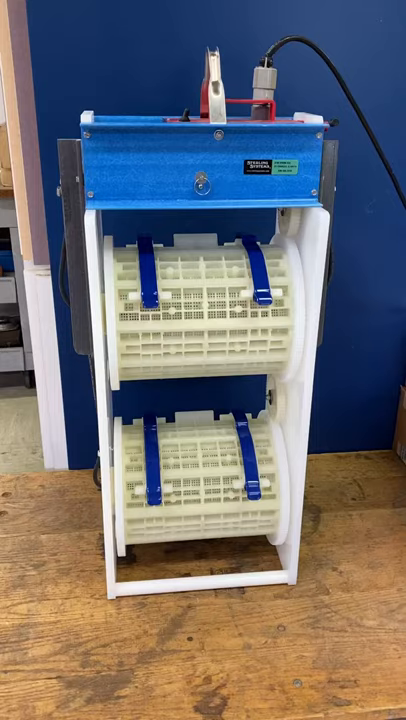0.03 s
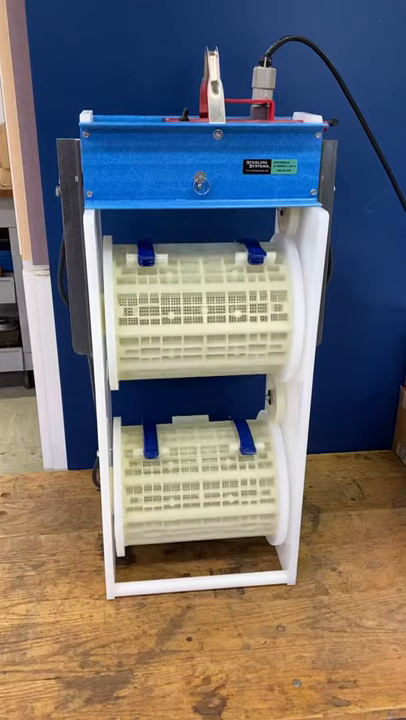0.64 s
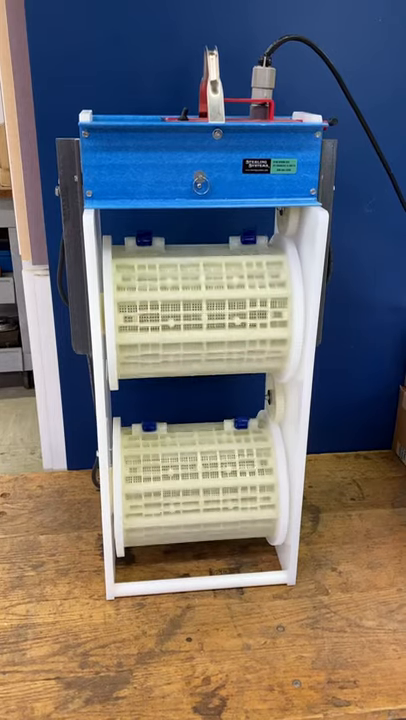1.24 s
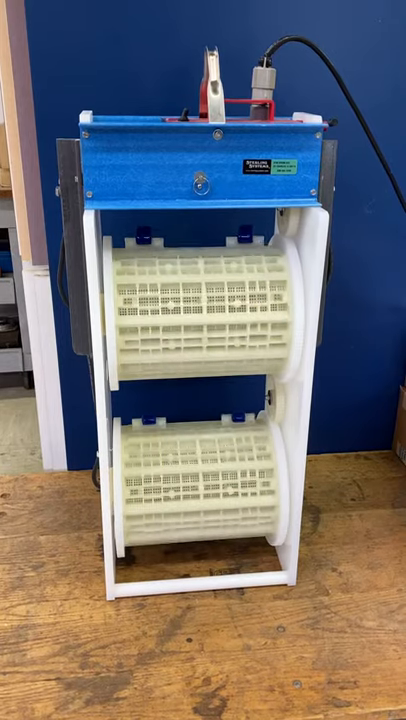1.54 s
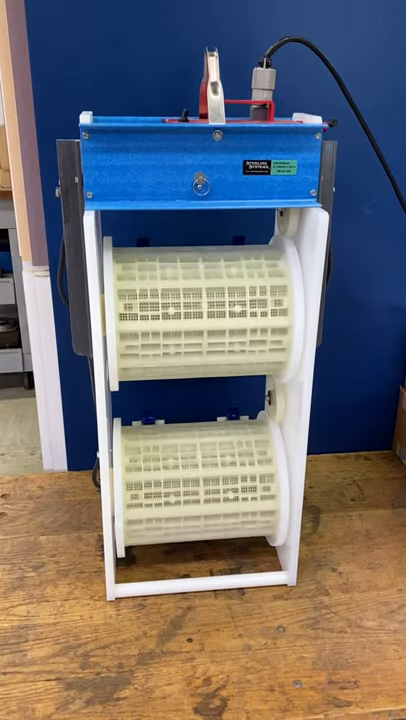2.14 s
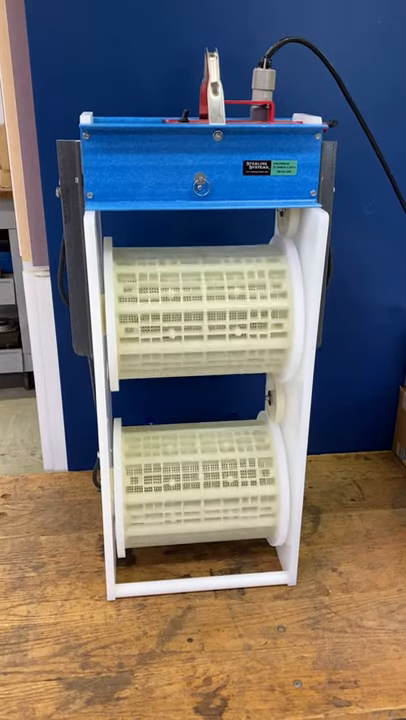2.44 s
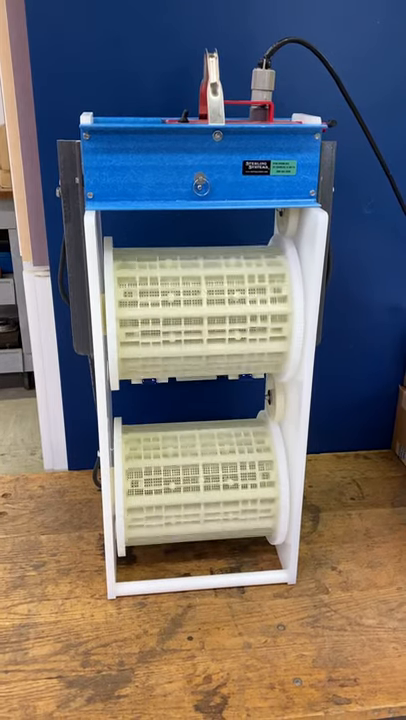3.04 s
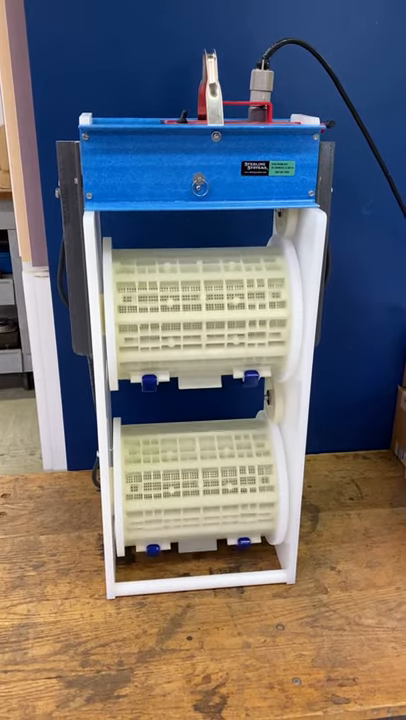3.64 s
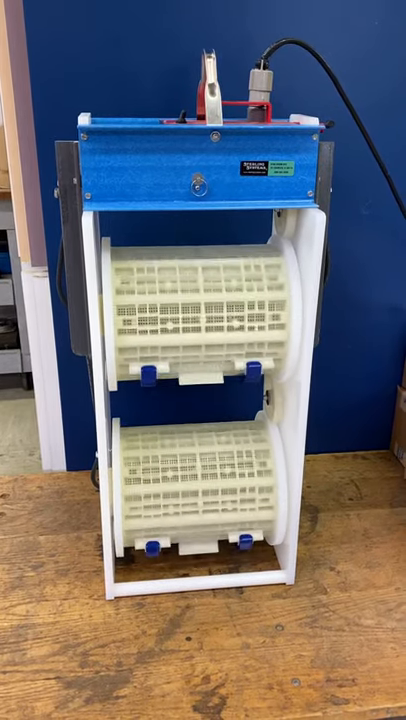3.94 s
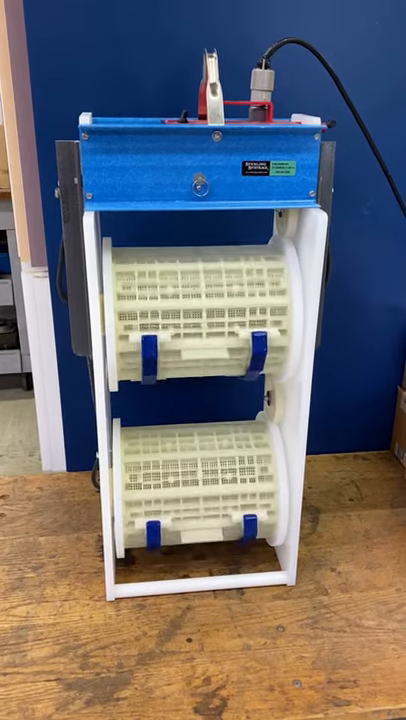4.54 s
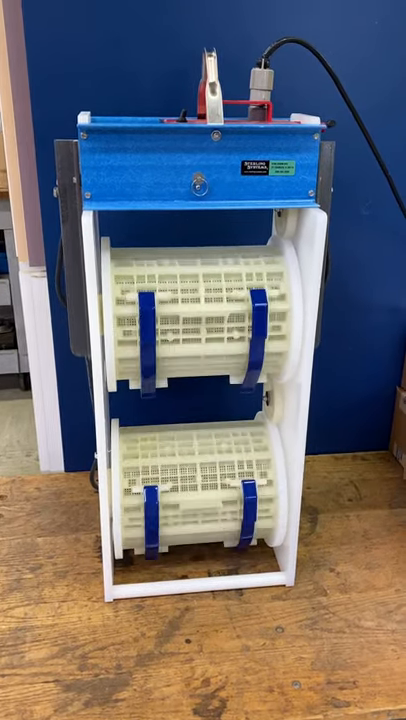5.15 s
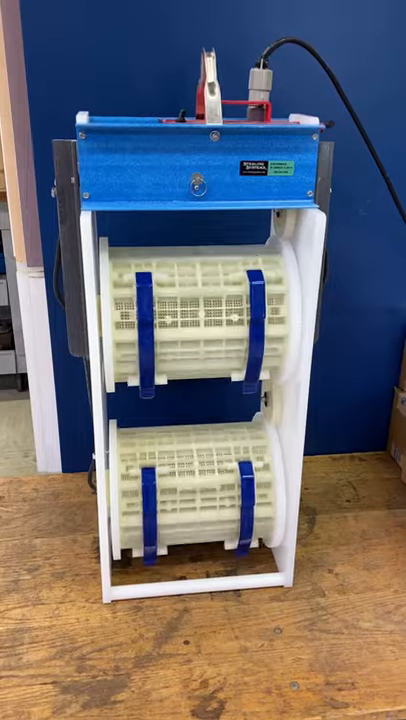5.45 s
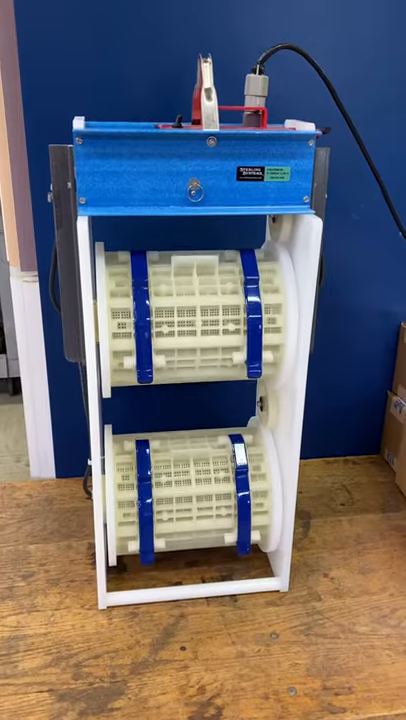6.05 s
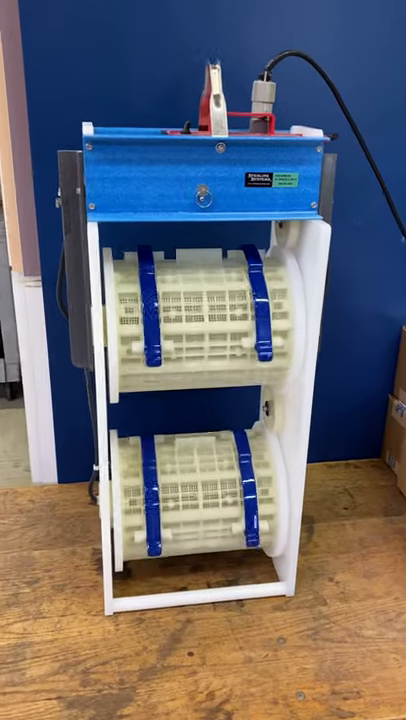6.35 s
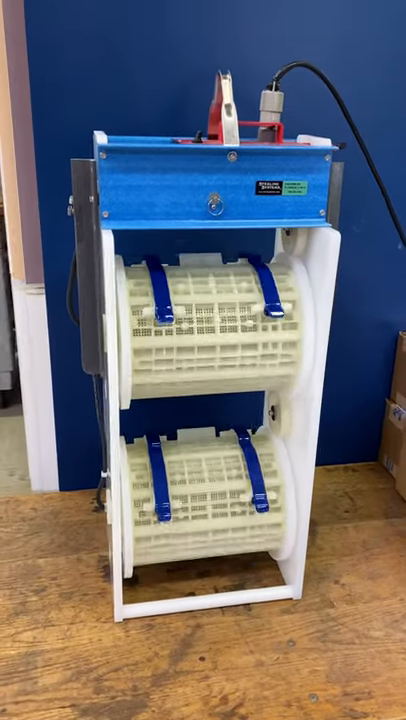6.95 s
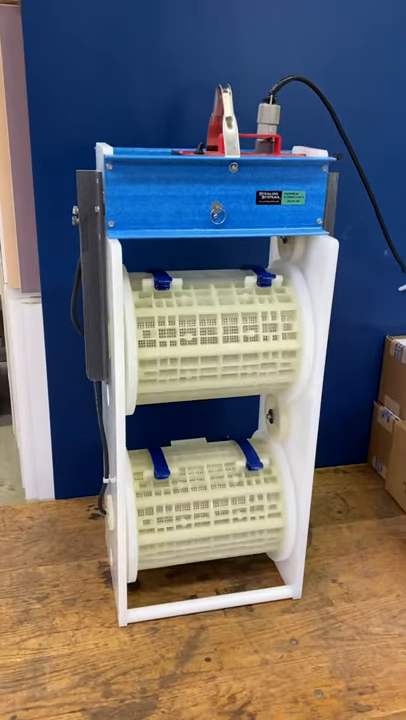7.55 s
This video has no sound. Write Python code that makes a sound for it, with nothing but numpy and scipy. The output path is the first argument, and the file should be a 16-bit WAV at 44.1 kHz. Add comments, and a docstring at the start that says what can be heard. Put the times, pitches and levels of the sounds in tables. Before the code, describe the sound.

A small geared motor runs for the whole eight seconds with a steady low hum, a whirr of gears and light grainy rubbing, turning two plastic drums. From about 0.3 seconds, a gear tooth takes up the load roughly every 0.7 seconds with a short clatter that rings the plastic frame. Midway between the clatters, starting near 0.7 seconds, the drums drop with a soft, hollow knock, strongest around 2.1 and 4.1 seconds. Small ticks and thin snaps are scattered among them, the clearest near 3.7 seconds. A rim brushes lightly against the frame at that moment, then faintly again from about 5.7 to 6.5 seconds and after 7. Underneath, the wooden bench rumbles and gives occasional dull thumps. The knocks carry a short workshop room echo, and faint microphone hiss lies behind. The machine keeps the same pace to the end.

```python
"""A small geared motor turns two plastic plating barrels on a wooden workshop bench.
Shaft and mains hum, the housing drones, the gears whirr and rub. About every 0.7 s a tooth takes up the
load with a clatter that rings the plastic frame; half a tooth later the barrels drop through their play
with a soft, hollow knock. Tooth edges snap, a rim brushes the frame, the bench rumbles and thumps.
Knocks and snaps carry a short room tail; faint microphone hiss lies behind."""
import sys
import numpy as np
from scipy import signal
from scipy.fft import rfft, irfft
from scipy.io import wavfile

SR = 44100
rng = np.random.default_rng(int(sys.argv[2]) if len(sys.argv) > 2 else 0)


def materialize(psi):
    """Save the field psi as 16-bit PCM at rate SR to the path in sys.argv[1].

    A 1-D psi becomes a single channel; in a 2-D psi each row is a channel.
    """
    bounded = np.clip(np.atleast_2d(psi).T, -1, 1)
    quanta = np.round(bounded * 32767).astype(np.int16)
    wavfile.write(sys.argv[1], SR, quanta)


N = 343539
TIME = np.arange(N) / SR
FREQS_HZ = np.maximum(np.fft.rfftfreq(N, 1 / SR), 1)
SIDE = np.array([[1], [-1]])   # left, right sign

# Table levels are relative; the functions add their gains.
# two strongest hums: time_s, shaft_db, mains_db
HUM_LEVELS = [(0.06, -53, -49), (0.3, -51, -48.5), (1.0, -49, -50.5), (1.2, -55, -52), (1.45, -51, -50),
              (1.7, -56, -52), (1.95, -48.5, -49.5), (2.25, -49.5, -58), (2.55, -47.5, -56),
              (2.95, -52, -55), (3.25, -50, -64), (3.9, -50.5, -65), (4.4, -47, -57), (4.9, -51, -60),
              (5.15, -54, -50.5), (5.6, -61, -50), (6.45, -64, -50.5), (7.2, -53, -49), (7.79, -63, -48)]
# housing drone: time_s, level_db
DRONE_LEVEL = [(0.08, -54), (0.27, -52), (0.55, -53.5), (0.78, -54), (1.2, -55.5), (1.45, -56),
               (1.95, -53.5), (2.1, -53), (2.4, -58.5), (2.7, -57.5), (2.9, -52), (3.22, -52), (3.4, -58.5),
               (3.75, -60), (3.95, -59), (4.2, -58), (4.45, -56.5), (4.65, -61), (4.8, -57), (5.2, -69),
               (5.45, -50), (5.65, -66), (5.85, -61), (6.2, -52), (6.65, -60), (6.87, -50.5), (7.2, -54),
               (7.4, -55), (7.79, -59)]
# motor and gearbox lines: pitch_hz, level_db, waver_db
GEARBOX_TONES = [(33, -66, 2), (56.4, -62, 2), (243.2, -58.5, 2), (289, -69, 2), (359.7, -68, 2),
                 (391, -70, 3), (481, -65.5, 2), (486, -59.5, 1.5), (531, -67, 3), (539, -69, 3),
                 (600, -69, 2), (616.5, -69, 2), (633, -69, 2), (650, -71, 2), (674.5, -65, 2),
                 (720, -69, 2), (752, -72, 2), (771, -69, 2), (795, -69, 3), (867, -61.5, 2),
                 (1060, -72, 1), (1130, -75, 2), (2000, -79, 1), (2160, -80, 1), (2720, -85, 1)]
# electrical whine: pitch_hz, level_db, waver_db
WHINE_TONES = [(3718, -83.5, 2), (3838, -89, 2), (3958, -94, 2), (4000, -81, 2), (4078, -94, 2),
               (4318, -91.5, 2), (4438, -95, 2), (4557, -94, 2), (4677, -94, 2), (4797, -96, 2),
               (5277, -96, 2), (5757, -98, 2), (5999, -97, 2)]
# whine swell: time_s, gain_db
WHINE_GAIN = [(0, 0.5), (3.5, 0.5), (5.4, 3), (6.2, -1), (7.79, 0.5)]

# gear whirr: freq_hz, density_db
WHIRR_SPECTRUM = [(160, -25.5), (270, 0.5), (314, -8.5), (346, -5), (381, -4.5), (474, -2), (567, -6),
                  (650, -5.5), (880, -5), (917, -12.5), (1040, -8.5), (1480, -24.5), (2330, -20.5),
                  (2530, -27), (7200, -39.5), (9360, -63.5), (15800, -120)]
# whirr over the turn: time_s, gain_db
WHIRR_GAIN = [(0, -1), (0.8, 0), (1.5, 0), (2.3, -0.3), (2.75, 0), (3.15, 0), (3.45, 0), (4.1, 1.5),
              (4.6, 0.8), (5.5, 0), (6.1, 0.1), (6.8, 0.5), (7.25, -1), (7.79, -0.5)]
# whirr stereo width: freq_hz, side_to_mid_db
WHIRR_WIDTH = [(250, -16), (450, -11.5), (700, -1.5), (1200, -17), (2000, 0), (3000, 6), (4500, -10.5),
               (7000, -7)]
# whirr mid fed to the side: freq_hz, gain_db
WHIRR_LEAN = [(250, -21.0), (480, -5.5), (1100, 10.0), (2000, -33.5)]
# tooth rubbing: freq_hz, density_db
RUB_SPECTRUM = [(200, -42.5), (600, -15), (1000, 0), (1200, -0.5), (1420, -0.5), (1750, -6), (2060, -10.5),
                (2400, -6.5), (2880, -15), (3000, -12.5), (3400, -16), (4500, -25), (6500, -28.5),
                (8500, -72.5)]
# tooth pressure, as rubbing: time_s, gain_db
RUB_GAIN = [(0, 4.5), (1.4, 0), (2.6, 2), (3.7, 3), (4.6, 2.5), (5.5, 4), (5.8, 4.5), (6.9, 2.5), (7.79, 3)]

# tooth takes up the load: time_s, level_db, hardness_db, touch_before_s, touch_rel_db,
# second_after_s, second_rel_db, rebound_after_s, rebound_rel_db, tock_hz, tock_db
TOOTH_STRIKES = [(0.284, -44, -13, 0.044, 0.5, 0.023, 5, .045, 0.5, 2006, -1.5),
                 (.986, -45.5, -18, .085, -1, 0.0031, 0, 0.033, -1.5, 2070, -1.5),
                 (1.672, -43, -12, .055, -9.5, 0.0084, 1, .036, 0, 1925, -3),
                 (2.347, -41.5, -15, 0.063, -5.5, 0.0043, 0.5, .032, -1.5, 2330, -9),
                 (3.021, -42.5, -13.5, 0.047, -5, 0.0091, 4, 0.042, .5, 1510, -10.5),
                 (3.707, -40.5, -12.5, .042, -6, .002, -1, .019, 4, 1950, -2),
                 (4.434, -42, -12, 0.055, 1.5, 0.0037, 0, 0.043, 0, 1940, -6),
                 (5.094, -43, -12, .072, -3.5, 0.00409, 3, .03, -3, 2580, -4),
                 (5.789, -42.5, -12.5, 0.055, -5.5, 0.0041, -1.5, 0.022, -2, 2060, -1),
                 (6.464, -43, -14.5, 0.041, -0.5, .006, 4, 0.029, -4, 2020, 0.5),
                 (7.146, -44, -14, .053, 0.5, .012, 3, 0.034, 0.5, 2030, -2.5)]
# loaded tooth slips: time_s, level_db
TOOTH_SLIPS = [(0.961, -47.5), (1.112, -48.5), (1.142, -54), (1.815, -55.5), (2.403, -46.5), (2.49, -51),
               (2.519, -46.5), (3.158, -51), (3.804, -48), (3.833, -41), (4.342, -43.5), (4.406, -48),
               (4.537, -47), (5.25, -47), (5.872, -41), (6.617, -52.5), (7.299, -48.5), (7.771, -46.5)]
# barrels drop through their play: time_s, level_db, crack_db, hardness_db, pan_db,
# tock_hz, tock_db, second_rel_db, shell_rel_db
BARREL_DROPS = [(0.6658, -43, -25, -20, -1, 1460, -15, -3.5, -24),
                (1.338, -47, -24, -20, -1, 1490, -9, -2, -26),
                (2.078, -37, -26, -24, -1, 1570, -6.5, -6.5, -14.5),
                (2.767, -42, -32, -21, 0, 1494, -2.5, -5, -19),
                (3.411, -46.5, -20.5, -32, 0, 1450, -13, -3, -23),
                (4.080, -40, -24, -37, -2, 1870, -7.5, -4, -18),
                (4.794, -42, -26, -19, 0, 1580, -21, -1.5, -19),
                (5.487, -43, -15.5, -34, -0.5, 2170, -16, 3.5, -9.5),
                (6.157, -49, -27, -28, 0, 1850, -15, 1, -27),
                (6.859, -44.5, -29, -39, -2, 1320, -13, -4, -22),
                (7.528, -41, -23.5, -26, -1, 1370, -10, -6, -30)]
# plastic frame and barrel modes: pitch_hz, width_hz, level_db, pan_db
FRAME_MODES = [(390, 46, -10.5, 0.5), (540, 56, -2.5, 1.5), (694, 38, 3, 6), (853, 70, -7, 8),
               (980, 95, -2, 11), (1236, 54, 1, 3.5), (1413, 98, 1.5, 6), (1637, 72, -3.5, 0.5),
               (1810, 64, 3, 3), (2065, 340, -0.5, -2.5), (2266, 120, 0.5, -4), (2710, 320, -4, 3),
               (3015, 290, -1, 4.5), (3710, 390, -9, -7), (4260, 370, -16, -11)]
# tooth edge snaps: time_s, level_db, treble_rel_db
EDGE_SNAPS = [(0.309, -65, -45), (0.33, -62, -46), (2.079, -58.5, -48), (2.767, -61, -48),
              (3.020, -58, -52), (3.062, -56, -46), (3.704, -51, -51), (3.708, -58, -50), (3.724, -57, -42),
              (4.435, -63, -34), (4.476, -64, -6), (4.792, -55.5, -17), (5.095, -58, -42),
              (5.809, -65, -45), (6.467, -61.5, -45), (7.158, -58, -48)]
# rim brushing the frame: time_s, level_db
BRUSH_LEVEL = [(0, -91), (3.66, -87.5), (3.72, -60), (3.76, -74), (3.85, -87), (5.6, -88.5), (5.72, -72),
               (6.15, -71.5), (6.4, -75), (6.6, -82), (7.0, -87), (7.17, -70.5), (7.35, -84), (7.7, -73),
               (7.79, -81)]
# sliding plastic: freq_hz, density_db
BRUSH_SPECTRUM = [(2000, -52.5), (4000, -4), (4530, 5), (5000, -16), (6000, -4.5), (6800, -22),
                  (8500, -55.5)]

# bench rumble: freq_hz, density_db
RUMBLE_SPECTRUM = [(12, -50), (28, -23), (34, -12), (50, -6), (68, -9), (84, -6), (100, 1), (112, -1),
                   (134, -14), (148, -8), (168, -6), (183, -17), (205, -8), (225, -11), (245, -14.5),
                   (320, -26), (900, -90)]
# rumble over the turn: time_s, gain_db
RUMBLE_GAIN = [(0, 0), (1.9, 1.5), (2.6, 1), (4.1, -1.5), (4.4, -1), (5.3, -1), (7.79, 1)]
# barrel lurches: start_s, level_db, tilt_db_per_octave
LURCHES = [(0.75, -49, -8), (1.37, -49, -10.5), (2.086, -53.5, 2.5), (2.42, -49.5, -10),
           (2.631, -47, -12.5), (3.029, -48, -20), (4.445, -58.5, 6.5), (4.531, -52, -16),
           (4.795, -58.5, 4.5), (5.491, -56.5, 0), (5.099, -48.5, -10), (5.7, -52, -0.5),
           (5.734, -46.5, -9)]
# bench top modes: pitch_hz, t60_s, level_db
BENCH_MODES = [(95.7, 0.46, 6), (132, 0.019, 17.5), (150.7, 0.56, 3), (221.3, 0.1, 16)]
# hiss common to both sides: freq_hz, density_db
HISS_MID_SPECTRUM = [(3000, -15.5), (5500, -14), (7000, -14), (8500, -35.5), (11000, -29.5), (12000, -1),
                     (13500, 11.5), (15700, 8.5)]
# hiss opposed between the sides: freq_hz, density_db
HISS_SIDE_SPECTRUM = [(2500, -32), (4700, 0.5), (6000, -8), (7400, -4.5), (9000, -2.5), (12000, -4),
                      (12800, -2.5), (15700, -10.5)]
# common hiss swell: time_s, gain_db
HISS_MID_GAIN = [(0, 0.5), (5.0, 0), (6.0, 0), (7.79, 1)]


def motor(shaft_hz=80.0, mains_hz=119.9, drone_gain_db=-1.5, gearbox_gain_db=-3.5):
    """Shaft and mains hum, housing drone at twice the mains hum, gearbox tones, faint whine."""
    shaft_db, mains_db = curves(HUM_LEVELS)
    drone_db, = curves(DRONE_LEVEL)
    whine_db, = curves(WHINE_GAIN)
    hum = tone(shaft_hz, shaft_db, waver_db=1.0, wander_rad=0.15)
    hum += tone(mains_hz, mains_db, waver_db=1.0, wander_rad=0.2)
    drone = tone(2 * mains_hz, drone_db + drone_gain_db, waver_db=1.5, wander_rad=0.3)
    gearbox = sum(tone(*row, wander_rad=0.18) for row in GEARBOX_TONES)
    gearbox = gearbox + 0.11 * SIDE * butter(gearbox, 560, "high", order=1)
    whine = sum(tone(*row, wander_rad=0.037) for row in WHINE_TONES)
    return hum + drone + from_db(gearbox_gain_db) * gearbox + from_db(whine_db) * whine


def gears(whirr_db=-52.5, load_lift_db=1.6, rub_idle_db=-64.5, rub_loaded_db=-61.5, top_hz=7200):
    """Gearbox whirr and grainy rubbing; both swell as each tooth is loaded."""
    load = tooth_load()
    turn_db, = curves(WHIRR_GAIN)
    pressure_db, = curves(RUB_GAIN)
    mid = noise(WHIRR_SPECTRUM)
    side = shaped(noise(WHIRR_SPECTRUM), WHIRR_WIDTH) + 0.3 * shaped(mid, WHIRR_LEAN)
    whirr = from_db(whirr_db + turn_db + load_lift_db * load + 1.8 * drift(70)) * (mid + SIDE * side)
    rub = noise(RUB_SPECTRUM) + 0.77 * SIDE * noise(RUB_SPECTRUM)
    rub *= np.hypot(from_db(rub_idle_db), from_db(rub_loaded_db) * load)
    rub *= from_db(pressure_db + drift(150))
    return butter(whirr + rub, top_hz, "low", order=8)


def tooth_load(lag_s=0.01, rise_s=0.099, fall_s=0.11):
    """Load, 0 to 1: rises as a tooth engages, falls as it rolls off."""
    load = np.zeros(N)
    for time_s, *_ in TOOTH_STRIKES:
        t = TIME - time_s - lag_s
        widths_from_peak = np.abs(t) / np.where(t < 0, rise_s, fall_s)
        load += np.exp(-np.minimum(widths_from_peak, 10) ** 2)
    return load


def tooth_clatter(lead_s=0.006, slip_hardness_db=-21, settle_db=-55.5, settle_hardness_db=-21.5):
    """Each tooth touches, strikes both barrels, rebounds and settles with two ticks; some slip."""
    out = np.zeros((2, N))
    light_tock = (1900, -12)   # tock_hz, tock_db
    blows = [(time_s, db, slip_hardness_db, light_tock) for time_s, db in TOOTH_SLIPS]
    for (time_s, db, hardness_db, touch_s, touch_db, second_s, second_db,
         rebound_s, rebound_db, *tock) in TOOTH_STRIKES:
        blows += [(time_s - touch_s, db + touch_db, hardness_db - 7, light_tock),
                  (time_s, db, hardness_db, tock),
                  (time_s + second_s, db + second_db, hardness_db, tock),
                  (time_s + rebound_s, db + rebound_db, hardness_db - 13.5, tock)]
        for settle_s in rng.uniform(0.065, 0.22, size=2):
            blows.append((time_s + settle_s, settle_db, settle_hardness_db, light_tock))
    for time_s, db, hardness_db, tock in blows:
        crack_db = -6 + 0.67 * hardness_db
        blow = knock(hardness_db, crack_db, *tock, fall_s=0.0042, blow_db=16)
        add(out, time_s - lead_s, from_db(db) * pan(0.5) * blow)
    return out


def barrel_drops(lead_s=0.0063, gap_s=0.0042, shell_hz=995, shell_t60_s=0.069):
    """The barrels fall through their play, one just after the other; a hollow shell rings."""
    out, t = np.zeros((2, N)), TIME[:SR // 10]
    envelope = from_db(-60 * t / shell_t60_s) * (1 - np.exp(-t / 0.0022))
    shell = unit_rms(envelope * np.sin(2 * np.pi * shell_hz * t))
    for time_s, db, crack_db, hardness_db, pan_db, tock_hz, tock_db, second_db, shell_db in BARREL_DROPS:
        for landing_s, landing_db in ((time_s, db), (time_s + gap_s, db + second_db)):
            landing = knock(hardness_db, crack_db, tock_hz, tock_db, fall_s=0.004, blow_db=20)
            add(out, landing_s - lead_s, from_db(landing_db) * pan(pan_db) * landing)
        add(out, time_s, from_db(db + shell_db) * pan(4) * shell)
    return out


def knock(hardness_db, crack_db, tock_hz, tock_db, fall_s, blow_db, grind_s=0.005, tock_feed_s=0.006):
    """A contact rings the frame and the struck spot (tock); harder ones grind more and ring brighter."""
    force = from_db(7.5 + hardness_db) * contact(rise_s=0.0011, fall_s=0.0031, spread=0.39)
    seating = contact(rise_s=0.00092, fall_s=fall_s, spread=0.19, linger_db=-19, linger_s=0.018)
    add(force, grind_s, seating)
    add(force, grind_s + 0.001, from_db([blow_db]))   # solid blow
    for cutoff_hz in (3500, 6000):
        force = butter(force, cutoff_hz, "low", order=6)
    low, middle, high = frame_ring(force)
    blow_window = np.exp(-(TIME[:force.shape[1]] / (grind_s + tock_feed_s)) ** 4)
    tock = resonate(force * blow_window, tock_hz, width_hz=190)
    tock = unit_rms(resonate(tock, tock_hz, width_hz=760))
    tock *= pan(np.interp(tock_hz, [1400, 2000], [3.5, 0]))
    body = low + from_db(tock_db + 1) * tock
    return from_db(-11.5) * body + from_db(crack_db) * middle + from_db(hardness_db - 7.5) * high


def frame_ring(force, scatter=0.022, low_top_hz=1750, middle_top_hz=2500):
    """Frame modes in three unit-rms bands; pitches shift with the spot struck."""
    detune = 1 + scatter * rng.standard_normal(len(FRAME_MODES))
    bands = np.zeros((3, *force.shape))
    for k, (hz, width_hz, db, pan_db) in enumerate(FRAME_MODES):
        band = np.digitize(hz, [low_top_hz, middle_top_hz])
        bands[band] += (-1) ** k * from_db(db) * pan(pan_db) * resonate(force, hz * detune[k], width_hz)
    return [unit_rms(ring) for ring in bands]


def contact(rise_s, fall_s, spread, linger_db=-69.5, linger_s=0.015):
    """Stereo contact force: milliseconds of chatter, then lingering rub."""
    t = TIME[:SR // 10]
    mid, side = rng.standard_normal((2, len(t)))
    attack = 1 - np.exp(-(t / rise_s) ** 2)
    decay = np.exp(-t / fall_s) + from_db(linger_db) * np.exp(-t / linger_s)
    return (mid + spread * side * SIDE) * attack * decay


def edge_snaps(gain_db=9.5, bottom_hz=3800, top_hz=6500):
    """A tooth edge slips off with a thin, wide rasp; the sharpest reach the top treble."""
    out = np.zeros((2, N))
    for time_s, db, treble_db in EDGE_SNAPS:
        tick = butter(contact(rise_s=0.0008, fall_s=0.004, spread=0.91), bottom_hz, "high")
        rasp = butter(tick, top_hz, "low", order=12)
        add(out, time_s, from_db(db + gain_db) * (rasp + from_db(treble_db) * tick))
    return out


def rim_brush(grain_db=2.5):
    """A barrel rim slides on the frame for part of its turn: light and grainy."""
    level_db, = curves(BRUSH_LEVEL)
    envelope = from_db(level_db + grain_db * drift(75))
    return envelope * np.array([noise(BRUSH_SPECTRUM), noise(BRUSH_SPECTRUM)])


def bench_rumble(level_db=-48, waver_db=0.25):
    """The running gear shakes the bench into a low, uneven rumble."""
    turn_db, = curves(RUMBLE_GAIN)
    return from_db(level_db + turn_db + waver_db * drift(5.6)) * noise(RUMBLE_SPECTRUM)


def bench_thumps(gain_db=3.5, rise_s=0.0027):
    """Barrel lurches ring the bench top; slow ones stir only the lowest modes."""
    out, t = np.zeros(N), TIME[:SR // 3]
    lowest_hz = BENCH_MODES[0][0]
    for start_s, db, tilt_db_per_octave in LURCHES:
        for hz, t60_s, mode_db in BENCH_MODES:
            ring_db = db + gain_db + mode_db + tilt_db_per_octave * np.log2(hz / lowest_hz)
            envelope = from_db(ring_db - 60 * t / t60_s) * (1 - np.exp(-t / rise_s))
            add(out, start_s, envelope * np.sin(2 * np.pi * hz * t) * rng.choice([-1, 1]))
    return out


def workshop(x, wet_db=-14, t60_s=0.19, top_hz=5000):
    """Direct sound plus a short diffuse tail from the walls."""
    t = TIME[:SR // 2]
    tail = butter(rng.standard_normal((2, len(t))), top_hz, "low")
    tail *= from_db(-60 * t / t60_s) * (1 - np.exp(-t / 0.0013))
    wet = signal.fftconvolve(x, unit_rms(tail) / np.sqrt(len(t)), axes=1)[:, :N]
    return x + from_db(wet_db) * wet


def microphone_hiss(mid_db=-74.8, side_db=-69.5):
    """Wide hiss, mostly opposed between the sides."""
    swell_db, = curves(HISS_MID_GAIN)
    mid = from_db(mid_db + swell_db) * noise(HISS_MID_SPECTRUM)
    return mid + from_db(side_db) * SIDE * noise(HISS_SIDE_SPECTRUM)


def tone(hz, rms_db, waver_db, wander_rad):
    """Sine with random wander in phase and level."""
    phase = 2 * np.pi * (hz * TIME + rng.random()) + wander_rad * drift(4.7)
    return np.sqrt(2) * from_db(rms_db + waver_db * drift(6)) * np.sin(phase)


def from_db(db):
    """Decibels to gain."""
    return 10 ** (np.asarray(db) / 20)


def unit_rms(x):
    """Scale to rms 1."""
    return x / np.sqrt(np.mean(x ** 2) + 1e-20)


def curves(rows):
    """Each column after time_s, interpolated per sample."""
    time_s, *columns = np.transpose(rows)
    return [np.interp(TIME, time_s, column) for column in columns]


def shaped(x, spectrum):
    """Filter by (freq_hz, gain_db) points."""
    hz, db = np.transpose(spectrum)
    gain = from_db(np.interp(np.log(FREQS_HZ), np.log(hz), db))
    return irfft(rfft(x) * gain, N)


def noise(spectrum):
    """Coloured noise, rms 1."""
    return unit_rms(shaped(rng.standard_normal(N), spectrum))


def drift(knots_per_s):
    """Random wander, rms 1."""
    knots = rng.standard_normal(N // 100)
    return unit_rms(np.interp(TIME * knots_per_s, np.arange(len(knots)), knots))


def pan(left_over_right_db):
    """Left and right gains."""
    return from_db(SIDE * left_over_right_db / 2)


def butter(x, hz, kind, order=2):
    """Causal low- or high-pass."""
    return signal.sosfilt(signal.butter(order, hz, kind, fs=SR, output="sos"), x)


def resonate(x, hz, width_hz):
    """One resonance, peak gain 1."""
    r = np.exp(-np.pi * width_hz / SR)
    gain = (1 - r * r) / 2
    return signal.lfilter([gain, 0, -gain], [1, -2 * r * np.cos(2 * np.pi * hz / SR), r * r], x)


def add(out, start_s, sound):
    """Mix a sound in at start_s."""
    start = max(int(start_s * SR), 0)
    out[..., start:start + sound.shape[-1]] += sound[..., :out.shape[-1] - start]


def scene():
    """The running machine, one sample earlier on the left, over hiss."""
    impacts = workshop(tooth_clatter() + barrel_drops() + edge_snaps())
    left, right = impacts + bench_thumps() + motor() + bench_rumble() + gears() + rim_brush()
    return np.array([left, np.roll(right, 1)]) + microphone_hiss()


def record(dry, silent_s=0.034, fade_s=0.012, cutoff_hz=15780):
    """Brief silence, fast fade-in, steep low-pass."""
    fade_in = np.clip((TIME - silent_s) / fade_s, 0, 1)
    lowpass = signal.ellip(14, 0.1, 80, cutoff_hz, fs=SR, output="sos")
    return signal.sosfilt(lowpass, dry * fade_in)


dry = scene()
out = record(dry)
materialize(out)
```